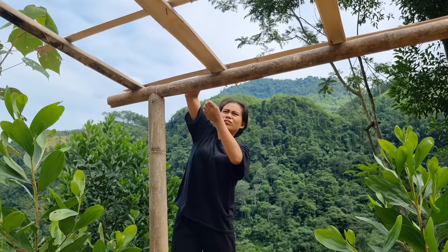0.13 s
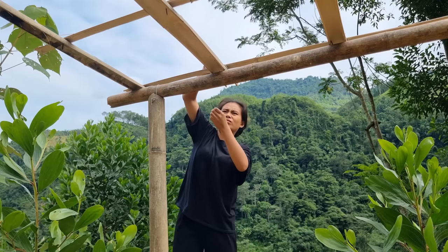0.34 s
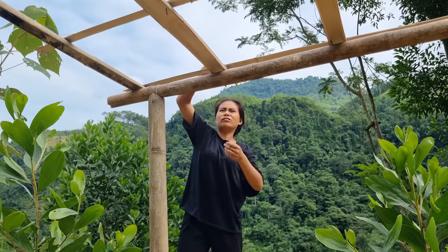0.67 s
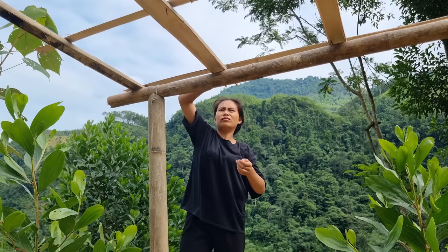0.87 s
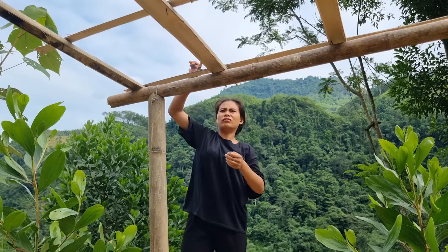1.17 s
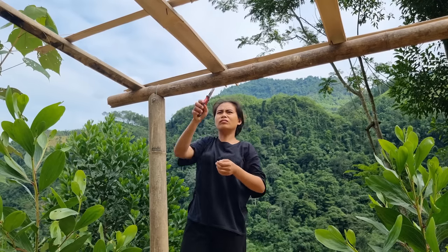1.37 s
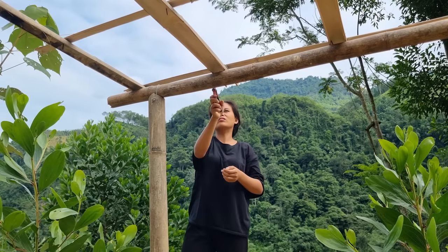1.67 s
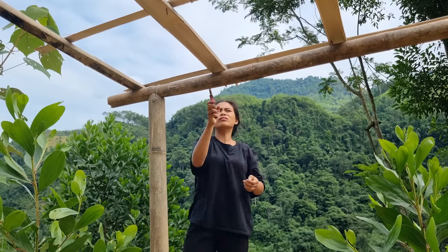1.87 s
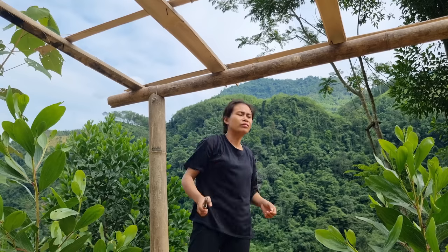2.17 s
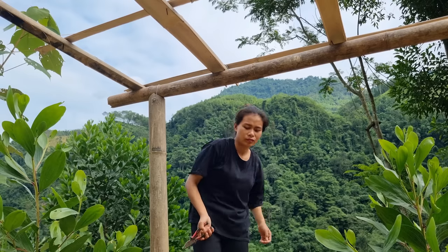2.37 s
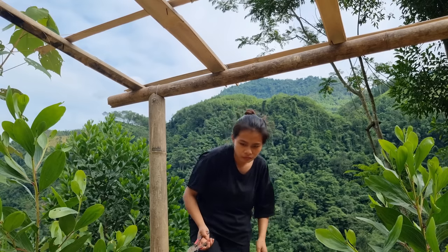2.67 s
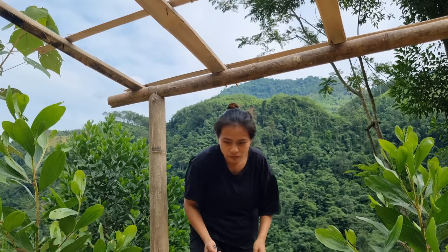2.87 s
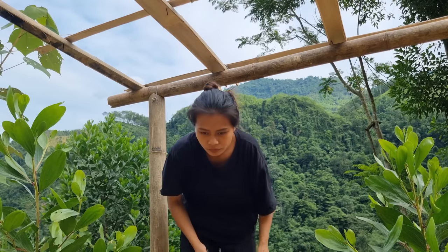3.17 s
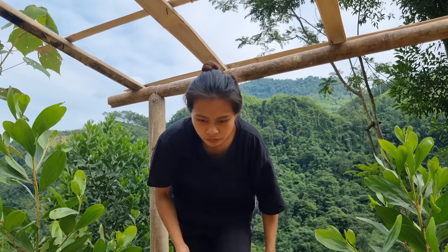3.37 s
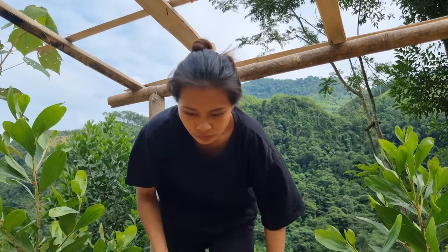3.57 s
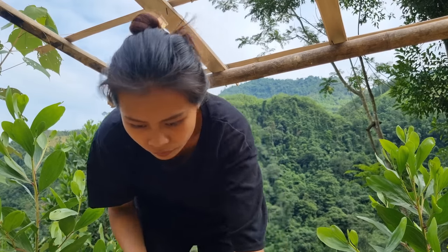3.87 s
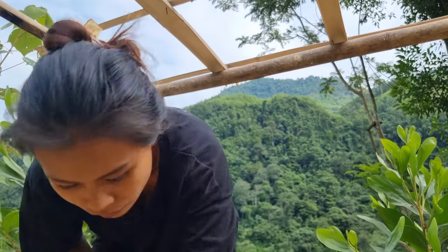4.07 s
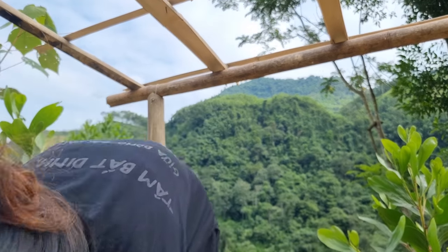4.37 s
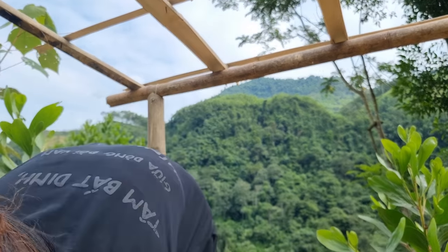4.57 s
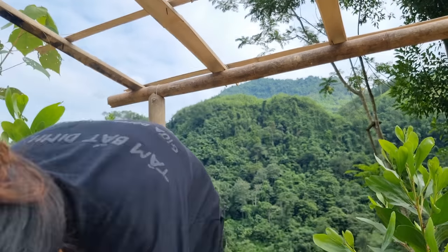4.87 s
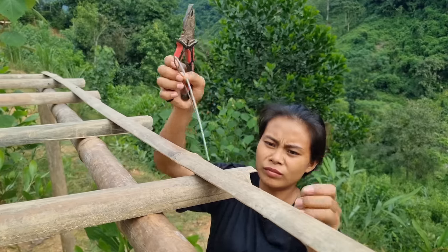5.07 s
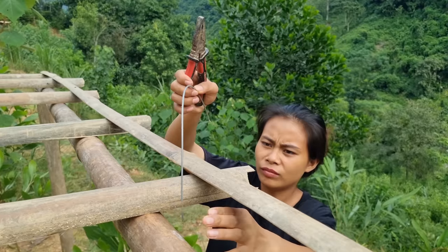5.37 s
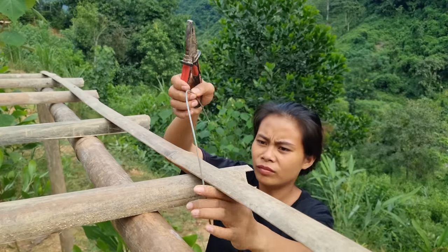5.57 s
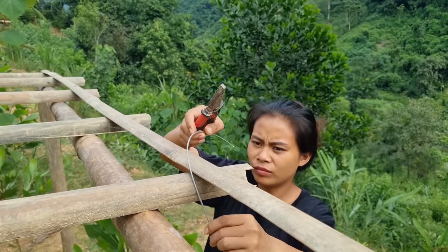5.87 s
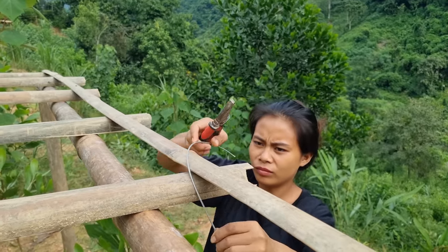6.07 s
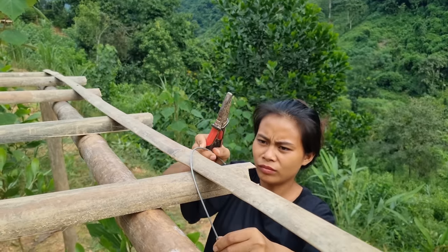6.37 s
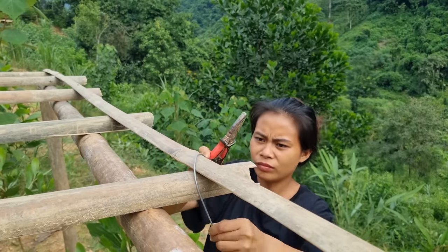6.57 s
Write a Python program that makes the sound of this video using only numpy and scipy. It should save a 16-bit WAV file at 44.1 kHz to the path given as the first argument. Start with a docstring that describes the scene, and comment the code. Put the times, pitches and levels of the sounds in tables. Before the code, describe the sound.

On an open hillside, pliers and wire tap lightly on a wooden pole frame, with scrapes and tiny squeaks. A loud woody knock and a sharper tap follow, then dry litter crunches, cloth rustles and hair flicks close to the stereo microphones. After a short total silence, a closer spot brings a rail knock, a rasping wire pull and light final taps. Soft air, insects and low rumble lie behind.

```python
"""Hand work with wire and pliers on a pole frame on an open hillside, in stereo, a little left of the microphones.
Knocks and taps ring the wood's decaying modes; scrapes and the wire pull are trains of stick-slip jerks.
Dry litter crunches in small breaks, cloth and hair brush past as grainy hiss, short squeaks glide in pitch.
After a short silence a closer spot follows, where wire is drawn round a pole. Behind lie shaped noise for
air and insects, a pulsed cricket tone, a low rumble, a thin whistle and, at the first spot, a far drone."""
import sys
import numpy as np
from scipy import signal
from scipy.fft import rfft, irfft
from scipy.io import wavfile
from scipy.ndimage import uniform_filter1d, map_coordinates

SR = 44100
rng = np.random.default_rng(int(sys.argv[2]) if len(sys.argv) > 2 else 0)


def store_wav(level_fs):
    """Save 16-bit WAV to argv[1]."""
    pcm = np.round(np.clip(np.atleast_2d(level_fs), -1, 1) * 32767)
    wavfile.write(sys.argv[1], SR, pcm.T.astype(np.int16))


N = 296793
TIME = np.arange(N) / SR
RING_TIME = TIME[:SR // 3]
SIDES = np.array([[1], [-1]])  # left, right

# Blows on thick poles, rails and thin poles; a harder contact has a higher edge:
# (time [s], level [dB], contact edge [Hz], pitch of that pole [ratio])
POLE_KNOCKS = [(1.042, -45.5, 2800, 1), (1.6355, -23.5, 2400, 1.0)]
RAIL_KNOCKS = [(.7627, -40, 5240, 1.0), (5.2845, -38.5, 1460, 1.0), (5.666, -53.5, 806, 0.93),
               (5.9535, -60, 900, 1.04), (6.6635, -46.5, 3020, 1.1), (6.680, -49.5, 2220, 1.1)]
THIN_POLE_TAPS = [(.1003, -48, 2850, 0.89), (.1745, -44.5, 2300, 0.86), (.3145, -54, 1710, 0.97),
                  (.439, -58.5, 1470, 0.96), (.6203, -44.5, 1620, 0.95), (.7495, -50, 1420, 0.92),
                  (.842, -61, 1890, 0.87), (.991, -53.5, 1870, 1.1), (1.0132, -52.5, 1900, 0.93),
                  (1.0496, -40.5, 2050, 0.99), (1.056, -43, 2820, 1.13), (1.075, -54, 5200, 0.96),
                  (1.7912, -28, 4200, .99), (4.4892, -51, 880, 1.03), (5.662, -49.5, 4560, 1.1),
                  (5.674, -55, 4500, 1), (5.902, -56.5, 3600, 1.16), (5.947, -49.5, 1890, 0.8),
                  (5.9525, -42, 1690, 1.04), (6.5825, -57, 3400, 1.2), (6.664, -51, 4500, 1.29)]
# Modes of the struck wood: (frequency [Hz], level [dB], t60 [s])
THICK_POLE_MODES = [(303, -15.5, 0.055), (434.5, -8, 0.061), (508, -7.5, 0.073), (745, 2, 0.018),
                    (893, -0.5, 0.041), (1053, -15.5, 0.089), (1314, -12.0, 0.083), (1390, -11, 0.03),
                    (1514, -22.5, 0.08), (1700, -5.0, 0.017), (1780, -20, 0.089), (1925, -10.5, 0.049),
                    (2594, -2, 0.022), (3550, -9, 0.0083)]
RAIL_MODES = [(325, -18.5, 0.087), (478, -9.0, 0.067), (545, -10.5, 0.13), (660, -9, 0.034),
              (800, -2, 0.026), (959, -9, 0.031), (1113, -14, 0.097), (1214, 1, 0.034),
              (1456, -38.0, 0.018), (1765, -3.5, 0.035), (2382, -7.5, 0.029), (2720, -6, 0.018)]
THIN_POLE_MODES = [(338, -12, 0.12), (508, -21, .05), (809, -11, 0.06), (1183, -5.5, 0.032),
                   (1263, -24, 0.11), (1380, -8, .021), (1656, -10, .033), (1790, -21.5, .07),
                   (2030, -20, 0.069), (2232, 0.5, 0.017), (2485, -25.5, 0.077), (2636, -10, 0.021),
                   (2970, -9.5, .018), (3510, -12, .015)]
# Colour of the wood's many short-lived overtones: (frequency [Hz], level [dB])
WOOD_COLOUR = [(100, -3.5), (300, 0), (800, -4.5), (1500, -0.5), (2500, -6.5), (3500, -4.5), (5500, -8),
               (8500, -20.5), (15000, -27)]
# Wire dragged on wood: (start [s], length [s], level [dB], contact edge [Hz])
WIRE_SCRAPES = [(0.687, 0.054, -52.5, 1470), (0.745, 0.035, -36.5, 1700), (0.786, .11, -55, 1760),
                (0.967, 0.13, -44, 1320), (1.042, 0.068, -40.5, 5750), (6.633, 0.17, -45, 1800)]
# One pull of the wire round the pole: (time [s], pitch of its resonances [ratio], level [dB])
WIRE_PULL_PATH = [(5.665, 0.96, -67), (5.71, 1.03, -54.5), (5.775, 1, -52.5), (5.87, 1.01, -54.5),
                  (5.925, 1.01, -55), (5.995, 0.88, -66)]
# Modes of the taut wire: (frequency [Hz], level [dB], t60 [s])
WIRE_MODES = [(518, -1.5, 0.21), (1131, 3.5, 0.095), (1370, 3.5, 0.052), (1874, 3.5, 0.039),
              (2670, 12, .012), (2800, 5, .02), (3874, 9.5, .015), (4380, 16, 0.011)]
# Wire squeaking as it slips in the binding:
# (start [s], length [s], first pitch [Hz], last pitch [Hz], level [dB])
WIRE_CREAKS = [(0.741, 0.025, 1840, 1564, -43), (0.833, 0.019, 1794, 1850, -48.5),
               (0.855, 0.033, 1763, 1525, -55)]
# Soft bumps of the frame's loose joints: (time [s], lower mode [Hz], peak level [dB])
JOINT_BUMPS = [(1.803, 238, -45), (1.9, 240, -54.5), (1.958, 81.5, -56), (5.667, 202, -52),
               (5.953, 211, -50.5)]
# Dry litter crunching underfoot: (start [s], length [s], level [dB], low edge [Hz], pitch [ratio])
LITTER_CRUNCHES = [(2.783, 0.013, -52.5, 2300, 1.15), (2.901, 0.044, -61.5, 1300, 0.97),
                   (3.483, 0.074, -42.5, 1080, 1), (3.675, 0.013, -60, 2600, 1.2)]
# Single dry snaps within the loudest step: (time [s], level [dB], low edge [Hz])
LITTER_SNAPS = [(3.5108, -50, 1510), (3.5205, -50.5, 1990)]
# Modes of the dry litter: (frequency [Hz], level [dB], t60 [s])
LITTER_MODES = [(1295, -6, 0.054), (1770, 0, 0.028), (2000, 0.5, 0.029), (2640, 5.5, 0.02),
                (3250, 2, 0.015), (3850, 3.5, 0.011)]
# Clothes and leaves brushing by: (start [s], length [s], level [dB], fine hiss level [dB])
CLOTH_RUSTLES = [(3.876, 0.24, -59.5, -66.5), (3.934, 0.075, -51, -70), (4.005, 0.06, -54, -73)]
# Hair flicking past the microphone: (time [s], level [dB])
HAIR_FLICKS = [(4.526, -56), (4.667, -51), (4.704, -51.5), (4.797, -55.5), (4.856, -44.5)]
# Spectrum of the outdoor air, only its shape counts: (frequency [Hz], level [dB per Hz])
AIR_COLOUR = [(40, -10.5), (140, -7.5), (230, -0.5), (360, 1), (470, -4.5), (780, -3.5), (1700, -10.5),
              (2550, -11.5), (3300, -18), (5800, -32.5), (7800, -66), (9600, -45.5), (12500, -26.5),
              (15000, -20)]
# Stereo spread of the air: (frequency [Hz], side minus mid [dB], left minus right [dB])
AIR_SPREAD = [(99.4, -21.5, 7.5), (348, 3, 1.5), (895, 7.5, 0.5), (2355, 0.5, 7.5), (7700, 1.5, -4),
              (12900, 0, -2.5)]
# Far drone: (time [s], pitch before its wavering [Hz], level before its wavering [dB])
DRONE_PATH = [(0.0, 41.6, -79), (0.19, 44.1, -68.5), (2.48, 39.7, -76), (2.76, 49.2, -75),
              (3.59, 54.4, -71.5), (4.9, 54.25, -72)]

# The silence parts the first spot from the second, closer one
SILENCE_START_S, SILENCE_END_S = 4.903, 5.135
# Left minus right of the work, the shift further left at the closer spot, and its low-edge factor there
WORK_PAN_DB, NEAR_PAN_DB, NEAR_BASS = 2.5, 1.5, 0.66
# The bright tick of a contact has this level at this edge
TICK_DB, TICK_EDGE_HZ = -20, 5730


def blows(table, modes, low_hz, clatter_db, clatter_s, crack_db, spread, build_s):
    """Each blow cracks, then rings the wood's modes while its dense overtones build up and die."""
    out = np.zeros((2, N))
    for start, db, edge_hz, pitch in table:
        crack = clatter(t60=0.011, side=0.4)
        overtones = band(clatter(clatter_s, side=1.0), low_hz=600, high_hz=16000, order=1)
        overtones = overtones * (1 - np.exp(-RING_TIME / build_s))
        tones = ring([(hz * pitch, size, t60) for hz, size, t60 in modes], spread)
        wood = tones + undb(crack_db) * crack + undb(clatter_db) * overtones
        tick = rng.standard_normal(wood.shape) * np.exp(-RING_TIME / 0.006)
        sound = contact(wood, tick, start, low_hz, edge_hz)
        add(out, start, sound * blow_gain(db))
    return out


def knocks():
    """Dull knocks set the thick poles ringing."""
    return blows(POLE_KNOCKS, THICK_POLE_MODES, low_hz=430, clatter_db=-8.5, clatter_s=0.08,
                 crack_db=-18.5, spread=0.77, build_s=0.0009)


def taps():
    """Sharp taps of pliers and wire set the thin poles ringing."""
    return blows(THIN_POLE_TAPS, THIN_POLE_MODES, low_hz=910, clatter_db=-3.0, clatter_s=0.08,
                 crack_db=-8.5, spread=0.83, build_s=0.0006)


def rail_knocks():
    """Knocks set the rails ringing."""
    return blows(RAIL_KNOCKS, RAIL_MODES, low_hz=430, clatter_db=-4, clatter_s=0.065,
                 crack_db=-22, spread=0.57, build_s=0.00059)


def scrapes(low_edge_hz=550, db_per_octave=20):
    """Wire catches and slips on the wood at three places; every slip rings it, and more force reaches lower."""
    out = np.zeros((2, N))
    for start, length, db, edge_hz in WIRE_SCRAPES:
        press = swell(length, peak=0.63)
        wood = tick = 0
        for place in range(3):
            jerks = (slips(len(press), rate=700, scatter_db=3.5) * press)[None]
            body = clatter(t60=0.057, side=0.79) + ring(THIN_POLE_MODES, spread=0.78)
            wood = wood + signal.fftconvolve(jerks, body, axes=1)
            grit = rng.standard_normal((2, len(RING_TIME))) * np.exp(-RING_TIME / 0.0011)
            tick = tick + signal.fftconvolve(jerks, grit, axes=1)
        # the level stands for the force: the low edge sinks as it rises above -47.5 dB
        low_hz = low_edge_hz * 2 ** (-(db + 47.5) / db_per_octave)
        sound = contact(wood, tick, start, low_hz, edge_hz)
        add(out, start, sound * stroke_gain(press, sound, db))
    return out


def wire_pull(waver=0.0143, judder_db=1.5, rasp_db=0.5, hiss_db=-18):
    """Wire sliding round a pole rasps in resonances that rise and fall with the tension, under a fine hiss."""
    s, pitch, db = np.transpose(WIRE_PULL_PATH)
    rasp = band(clatter(t60=0.037, side=1.0), low_hz=800, high_hz=6350)
    body = ring(WIRE_MODES, spread=0.48) + undb(rasp_db) * rasp
    jerks = slips(N, rate=1400, scatter_db=4.5)
    sound = signal.fftconvolve(jerks[None], body, axes=1)[:, :N]
    # reading the sound faster or slower bends its pitch
    place = np.cumsum(np.interp(TIME, s, pitch) * (1 + waver * walk(120)))
    sound = unit(np.array([map_coordinates(ear, [place], order=3) for ear in sound]))
    hiss = fibres(N, low_hz=10500, high_hz=16000, apart=2.7) * undb(hiss_db) * pan(-5.0)
    level = undb(np.interp(TIME, s, db) + judder_db * walk(70))
    return (sound * pan(0.49) + hiss) * level * (TIME > s[0]) * (TIME < s[-1])


def creaks(waver=0.023, flutter_db=4.5):
    """The slips fall into step and the wire gives a short, unsteady, gliding squeak, made as a sine."""
    out = np.zeros((2, N))
    for start, length, from_hz, to_hz, db in WIRE_CREAKS:
        press = swell(length, peak=0.73)
        size = len(press)
        hz = np.linspace(from_hz, to_hz, size) * (1 + waver * walk(700)[:size])
        squeak = np.sin(2 * np.pi * np.cumsum(hz) / SR)
        level = undb(db + flutter_db * walk(400)[:size])
        add(out, start, squeak * press * level * pan(WORK_PAN_DB))
    return out


def surroundings(x, db=-24, t60=0.25, low_hz=150, high_hz=4500):
    """Ground, frame and foliage scatter back a faint tail of decaying noise."""
    tail = rng.standard_normal((2, len(RING_TIME))) * decay(t60) * (1 - np.exp(-RING_TIME / 0.0045))
    tail = band(unit(tail) / np.sqrt(len(RING_TIME)), low_hz, high_hz, order=1)
    return undb(db) * signal.fftconvolve(x, tail, axes=1)[:, :N]


def shudder(work, db=-33, near_db=3, t60=0.52, low_hz=62, high_hz=250):
    """The frame takes up the work's energy and trembles on, low and soft, more so from close by."""
    keep = np.exp(-2 * np.log(1000) / (t60 * SR))
    energy = signal.lfilter([1 - keep], [1, -keep], np.mean(work ** 2, axis=0))
    tremble = band(rng.standard_normal(N) + 0.5 * rng.standard_normal((2, N)), low_hz, high_hz)
    return unit(tremble) * np.sqrt(energy) * undb(db + near_db * closer(TIME)) * pan(2.5)


def bumps(rise_s=0.006, t60=0.1, overtone_db=-5, overtone_ratio=1.45):
    """Loose joints of the frame settle with soft, low bumps, each a pair of damped modes."""
    out = np.zeros((2, N))
    for start, hz, db in JOINT_BUMPS:
        bump = ring([(hz, 0, t60), (hz * overtone_ratio, overtone_db, t60)], spread=0.4)
        bump = bump * (1 - np.exp(-RING_TIME / rise_s))
        add(out, start, bump / abs(bump).max() * undb(db) * pan(WORK_PAN_DB))
    return out


def lean(start=6.5, length=0.5, hz=113, db=-62.5):
    """As she leans on it, the loaded frame gives a soft octave band of rumble that swells and eases."""
    out = np.zeros((2, N))
    press = swell(length, peak=0.49)
    rumble = band(rng.standard_normal(len(press)), hz / 2 ** 0.5, hz * 2 ** 0.5, order=4)
    add(out, start, unit(rumble) * press * undb(db) * pan(WORK_PAN_DB))
    return out


def brittle(low_hz, pitch, grit_db=1.0, top_hz=4400):
    """One break of dry litter rings its brittle modes over gritty noise; smaller pieces ring higher."""
    modes = [(hz * pitch, db, t60) for hz, db, t60 in LITTER_MODES]
    body = ring(modes, spread=0.71) + undb(grit_db) * clatter(t60=0.019, side=0.57)
    body = band(body, low_hz, top_hz * pitch, order=2)
    return unit(band(body, low_hz / 2, top_hz * pitch, order=6))


def crunches():
    """Dry litter gives way underfoot in runs of small breaks, with a few sharp snaps."""
    out = np.zeros((2, N))
    for start, length, db, low_hz, pitch in LITTER_CRUNCHES:
        press = swell(length, peak=0.36)
        breaks = slips(len(press), rate=2400, scatter_db=3.0) * press
        sound = unit(signal.fftconvolve(breaks[None], brittle(low_hz, pitch), axes=1))
        add(out, start, sound * stroke_gain(press, sound, db))
    for start, db, low_hz in LITTER_SNAPS:
        snap = unit(brittle(low_hz, pitch=0.93) * np.exp(-RING_TIME / 0.0096))
        add(out, start, snap * blow_gain(db))
    return out * pan(0.6)


def rustles(flutter_db=1.5):
    """Each brush of cloth or leaves swells and flutters, with a fine hiss on top."""
    out = np.zeros((2, N))
    for start, length, db, hiss_db in CLOTH_RUSTLES:
        press = swell(length, peak=0.35)
        size = len(press)
        press = press * undb(flutter_db * walk(169)[:size])
        brush = fibres(size, low_hz=1270, high_hz=4200, apart=1.0) * undb(db) * pan(0.6)
        hiss = fibres(size, low_hz=6340, high_hz=16400, apart=3.6) * undb(hiss_db) * pan(-6.0)
        add(out, start, (brush + hiss) * press)
    return out


def flicks(attack_s=0.001, t60=0.085, skirt_db=-14):
    """Strands of hair catch, stronger at the right microphone: a sudden, very high hiss that dies fast."""
    out = np.zeros((2, N))
    shape = (1 - np.exp(-RING_TIME / attack_s)) * decay(t60)
    for start, db in HAIR_FLICKS:
        hiss = fibres(len(shape), low_hz=13000, high_hz=16500, apart=2.8)
        skirt = fibres(len(shape), low_hz=3730, high_hz=10000, apart=1.0)
        add(out, start, (hiss + undb(skirt_db) * skirt) * shape * undb(db) * pan(-3.5))
    return out


def air(first_db=-63, near_db=2.5):
    """Wide, nearly steady wash of distant foliage and insects: shaped noise, louder at the closer spot."""
    hz = np.fft.rfftfreq(N, 1 / SR)
    mid, side = rfft(rng.standard_normal((2, N)))
    width = undb(along(AIR_SPREAD, hz))
    balance = undb(SIDES * along(AIR_SPREAD, hz, axis=2) / 2)
    ears = (mid + SIDES * width * side) * balance
    sound = irfft(ears * undb(along(AIR_COLOUR, hz)), N)
    return sound / np.std(sound.mean(axis=0)) * undb(first_db + near_db * closer(TIME) + 0.16 * walk(1.8))


def cricket(db=-81.0, near_drop_db=5, hz=8570, period_s=0.131, pulse_s=0.028):
    """One thin cricket chirps in pairs of pulses on a slightly wavering tone, softer at the closer spot."""
    since = (TIME + 0.002 * walk(3)) % period_s
    pulses = np.sin(np.pi * since / pulse_s) ** 2 * (since < 2 * pulse_s)
    tone = np.sqrt(2) * np.sin(2 * np.pi * np.cumsum(hz + 22 * walk(90)) / SR)
    return tone * pulses * undb(db - near_drop_db * closer(TIME) + 1.4 * walk(16))


def insects(chorus_db=-80.5, chorus_near_db=4, trill_db=-93, trill_near_db=7):
    """To the right, a steady noise-band chorus, and above it the cricket over the blurred trill of others."""
    chorus = narrow(hz=7326, width_hz=650) * undb(chorus_db + chorus_near_db * closer(TIME))
    trill_level = undb(trill_db + trill_near_db * closer(TIME) + 2.5 * walk(20))
    trill = narrow(hz=8485, width_hz=120) * trill_level
    return (chorus + cricket() + trill) * pan(-10.0)


def whistle(start_s=4.07, attack_s=0.023, hold_s=0.16, fade_s=0.12, hz=1296, db=-70, rest=0.26):
    """A thin, unsteady sine whistle, faint throughout, swells once and dies back."""
    tone = np.sin(2 * np.pi * np.cumsum(hz + 9 * walk(40)) / SR)
    age = np.maximum(TIME - start_s, 0)
    fade = np.exp(-np.maximum(age - hold_s, 0) / fade_s)
    blow = rest + np.minimum(age / attack_s, 1) * fade
    return tone * blow * undb(db + 4.0 * walk(30))


def drone():
    """A far, low sine wavers in pitch and level, at the first spot only."""
    s, hz, db = np.transpose(DRONE_PATH)
    turns = np.cumsum(np.interp(TIME, s, hz) * (1 + 0.054 * walk(6.3))) / SR
    level = undb(np.interp(TIME, s, db) + 0.71 * walk(6.2))
    return unit(np.sin(2 * np.pi * turns)) * level * (1 - closer(TIME)) * pan(1.7)


def rumble(db=-81):
    """A steady low rumble: one narrow band of noise."""
    return narrow(hz=85, width_hz=14) * undb(db)


def contact(wood, tick, start, low_hz, edge_hz):
    """A softer contact cuts the wood's treble; a harder one adds a bright tick, stronger on the right."""
    wood = band(wood, low_hz * NEAR_BASS ** closer(start), edge_hz)
    wood = np.array([unit(ear) for ear in wood]) * pan(WORK_PAN_DB + NEAR_PAN_DB * closer(start))
    # the tick grows with the cube of the edge
    tick_gain = undb(TICK_DB) * (edge_hz / TICK_EDGE_HZ) ** 3
    tick = unit(band(tick, low_hz=7000, high_hz=16700, order=1)) * tick_gain
    return wood + tick * pan(-7.5)


def ring(modes, spread):
    """Decaying modes, signs alternating in pairs; phases differ between the microphones (spread in radians)."""
    out = 0
    for k, (hz, db, t60) in enumerate(modes):
        phase = spread * rng.choice([-1, 1]) * SIDES
        detuned_hz = hz * (1 + 0.0073 * rng.standard_normal())
        wave = np.sin(2 * np.pi * detuned_hz * RING_TIME + phase)
        out = out + (-1) ** (k // 2) * undb(db) * wave * decay(t60)
    return unit(out * (1 - np.exp(-RING_TIME / 0.00043)))


def clatter(t60, side, slope=0.13):
    """Dense wood overtones as half-octave noise bands; t60 holds at 1 kHz and the high bands die first."""
    hz = np.fft.rfftfreq(len(RING_TIME), 1 / SR)
    mid, apart = rng.standard_normal((2, len(RING_TIME)))
    noise = rfft(mid + side * apart * SIDES) * undb(along(WOOD_COLOUR, hz))
    out = 0
    for centre in np.geomspace(125, 16000, 15):
        in_band = abs(np.log2((hz + 1) / centre)) < 1 / 4
        part = irfft(noise * in_band, len(RING_TIME))
        out = out + part * decay(t60 / (centre / 1000) ** slope)
    return unit(out)


def slips(shape, rate, scatter_db):
    """Stick-slip: tiny jerks of uneven size, either way, at random moments (rate per second)."""
    happens = rng.random(shape) < rate / SR
    return happens * rng.choice([-1, 1], shape) * undb(scatter_db * rng.standard_normal(shape))


def fibres(size, low_hz, high_hz, apart):
    """Dense dry grains of fibres flicking past each other, thinning gently below and steeply above."""
    grains = slips((3, size), rate=15000, scatter_db=7.5)
    sound = band(grains[0] + apart * grains[1:], low_hz, high_hz, order=2)
    return unit(band(sound, low_hz / 2, high_hz, order=5))


def narrow(hz, width_hz):
    """Stereo noise of rms 1 in one bell-shaped band."""
    bell = np.exp(-((np.fft.rfftfreq(N, 1 / SR) - hz) / width_hz) ** 2)
    return unit(irfft(rfft(rng.standard_normal((2, N))) * bell, N))


def swell(length, peak):
    """Pressure of one stroke: up to its strongest moment, a share of its length, and down again."""
    share = np.arange(0, 1, 1 / (length * SR))
    return np.interp(share, [0, np.clip(peak, 0.05, 0.95), 1], [0, 1, 0]) ** 0.79


def decay(t60):
    """Exponential decay by 60 dB in t60 seconds."""
    return np.exp(-np.log(1000) * RING_TIME / t60)


def blow_gain(db):
    """Gain for a ring of rms 1, its level counted as if all its energy lay in 30 ms."""
    return np.sqrt(0.03 / RING_TIME[-1]) * undb(db)


def stroke_gain(press, sound, db):
    """Gain that matches a sound of rms 1, tail included, to the energy of its stroke."""
    return np.sqrt(np.sum(press ** 2) / sound.shape[1]) * undb(db)


def closer(t):
    """1 at the second, closer spot, 0 at the first."""
    return 1. * (t > SILENCE_START_S)


def undb(db):
    """Decibels to gain."""
    return 10 ** (np.asarray(db) / 20)


def unit(x):
    """Scale to rms 1."""
    return x / np.sqrt(np.mean(x ** 2))


def pan(db):
    """Left and right gains for a level difference, left minus right."""
    return undb(SIDES * db / 2)


def along(table, hz, axis=1):
    """Read one column of a table on a log-frequency axis."""
    table = np.array(table)
    return np.interp(np.log(hz + 1), np.log(table[:, 0]), table[:, axis])


def band(x, low_hz, high_hz, order=2):
    """High-pass and low-pass in a row."""
    for hz, kind in ((low_hz, "high"), (high_hz, "low")):
        sections = signal.butter(order, min(hz, SR / 2 - 500), kind, fs=SR, output="sos")
        x = signal.sosfilt(sections, x)
    return x


def walk(rate):
    """Smooth random wander with a spread near 1, taking a new value rate times a second."""
    k = int(SR / rate)
    return uniform_filter1d(np.repeat(rng.standard_normal(N // k + 1), k), k)[:N]


def add(out, start, x):
    """Mix a stereo sound in at a time."""
    i = int(start * SR)
    out[:, i:i + x.shape[1]] += x[:, :N - i]


def scene(push_db=14):
    """The hand work outdoors; dragging wire shakes the frame more than a quick blow does."""
    struck = knocks() + taps() + rail_knocks()
    dragged = scrapes() + wire_pull()
    work = struck + dragged + creaks()
    frame = shudder(struck + undb(push_db) * dragged) + bumps() + lean()
    nearby = crunches() + rustles() + flicks()
    background = air() + insects() + whistle() + drone() + rumble()
    return work + surroundings(work) + frame + nearby + background


def record(dry, top_hz=15750):
    """The sound drops out between the two spots; the top is cut steeply."""
    corners = [SILENCE_START_S - 0.006, SILENCE_START_S + 0.004, SILENCE_END_S - 0.01, SILENCE_END_S + 0.04]
    fade = np.interp(TIME, corners, [1, 0, 0, 1])
    return signal.sosfilt(signal.ellip(10, 0.2, 70, top_hz, fs=SR, output="sos"), dry * fade)


dry = scene()
out = record(dry)
store_wav(out)
```